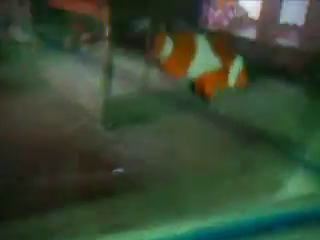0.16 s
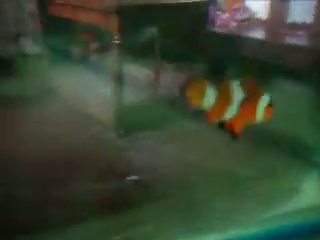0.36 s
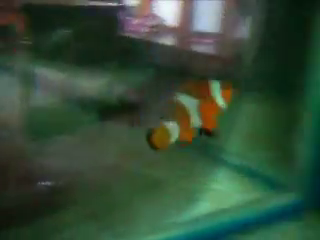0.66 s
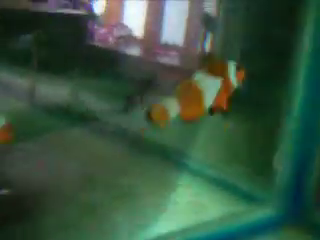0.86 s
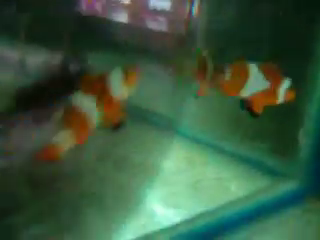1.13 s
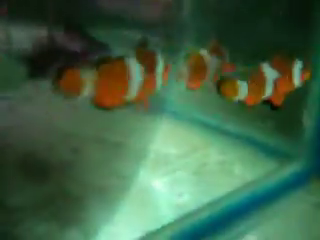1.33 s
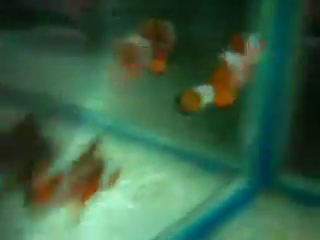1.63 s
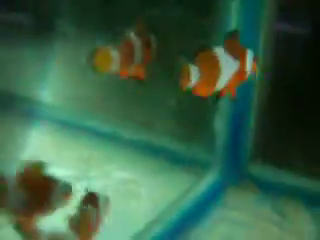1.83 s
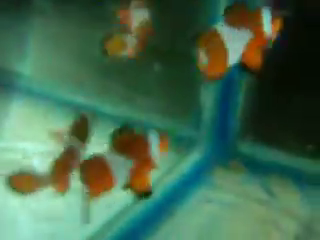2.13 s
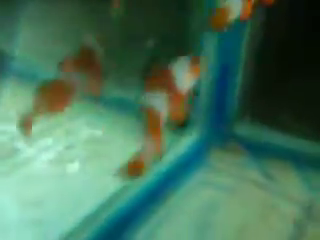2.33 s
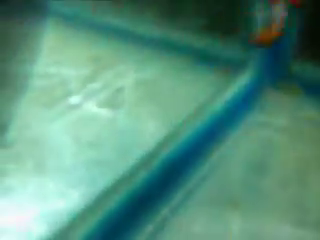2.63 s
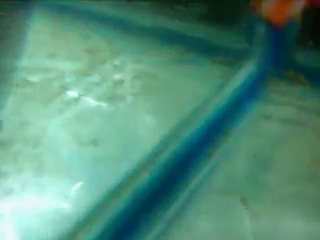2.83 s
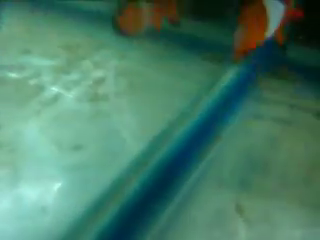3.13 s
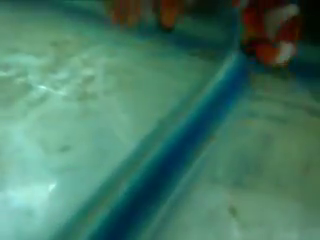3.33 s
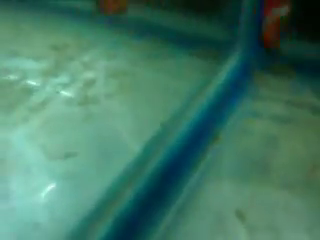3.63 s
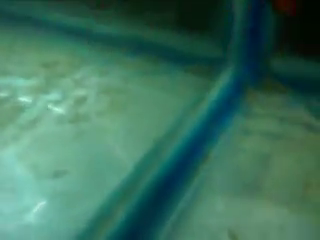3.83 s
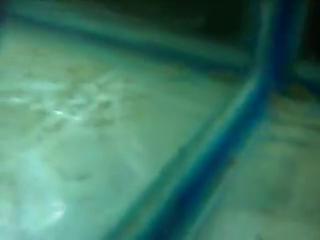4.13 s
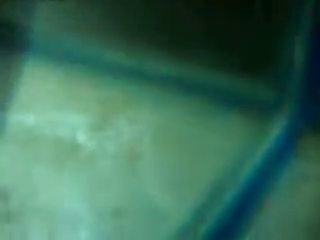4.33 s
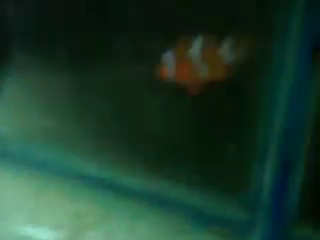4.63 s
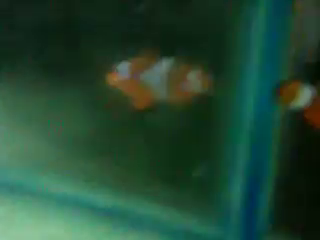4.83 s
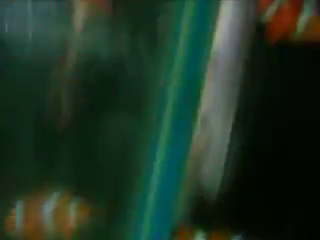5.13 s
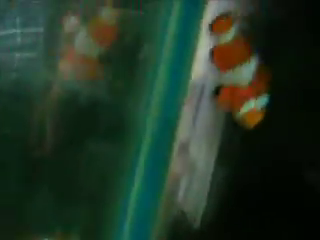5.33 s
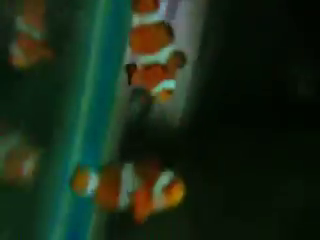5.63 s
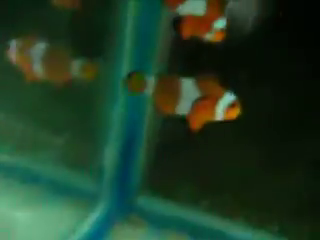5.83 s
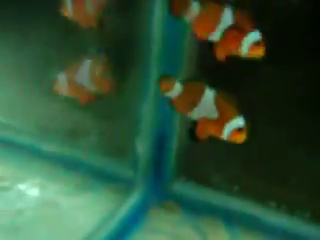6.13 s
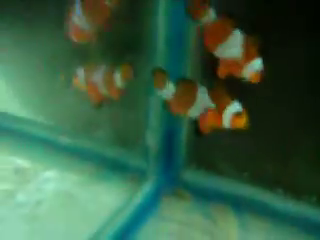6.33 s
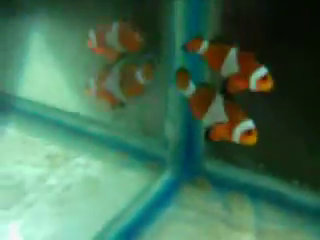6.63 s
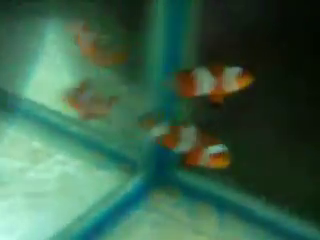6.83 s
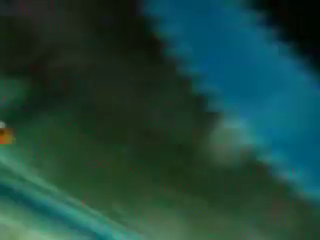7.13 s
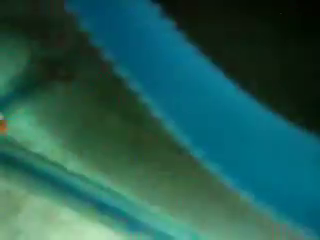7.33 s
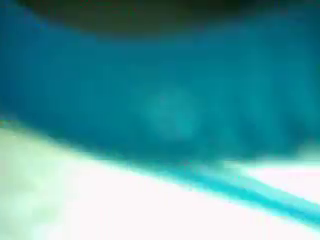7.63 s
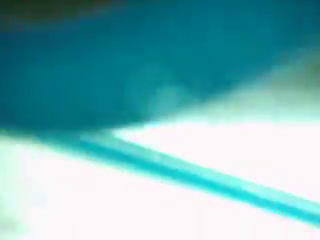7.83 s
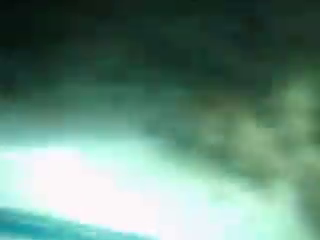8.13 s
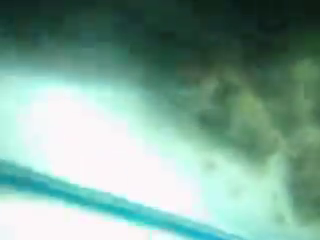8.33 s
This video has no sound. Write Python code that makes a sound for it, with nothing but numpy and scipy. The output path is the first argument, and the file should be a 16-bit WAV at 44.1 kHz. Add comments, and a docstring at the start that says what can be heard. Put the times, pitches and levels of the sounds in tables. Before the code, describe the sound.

Inside a fish tank, a low buzzing motor hum and water rumble are dotted with bubbles, ending in a burst of distorted gurgling.

```python
"""A hum and the rumble of water come first, soon with popping bubbles: a small camera in a waterproof case
is moved about inside a fish tank. The pump hum is a sum of mains harmonics that overloads the microphone,
the current is coloured noise, and bubbles are short gliding tones that set the case ringing.
At the end the case nears the surface: the water sloshes and gurgles round it and the hum fades away."""
import sys
import numpy as np
from scipy import signal
from scipy.fft import rfft, irfft, next_fast_len
from scipy.io import wavfile
from scipy.ndimage import uniform_filter1d

SR = 44100
rng = np.random.default_rng(int(sys.argv[2]) if len(sys.argv) > 2 else 0)


def inscribe(sig):
    """Save sig as 16-bit PCM at rate SR to the path in sys.argv[1].

    A 1-D sig is mono; a 2-D sig holds one channel per row.
    Samples are clipped to [-1, 1] before scaling.
    """
    pcm = np.round(np.clip(np.atleast_2d(sig).T, -1, 1) * 32767)
    wavfile.write(sys.argv[1], SR, pcm.astype(np.int16))


N = 373527


def from_db(db):
    """Decibels to gain."""
    return 10 ** (np.asarray(db) / 20)


def rms_one(x):
    """Scale to rms 1."""
    return x / np.sqrt(np.mean(x ** 2) + 1e-20)


def in_time(rows):
    """Each column of a curve table, joined by straight lines, at every sample."""
    seconds, *columns = np.transpose(rows)
    return [np.interp(np.arange(N) / SR, seconds, column) for column in columns]


def at_hz(points, hz):
    """Read a spectrum table on a log-frequency axis."""
    freqs, values = np.transpose(points)
    return np.interp(np.log(hz), np.log(freqs), values)


def drift(rate):
    """A slow random curve of spread 1, changing about rate times a second."""
    # made at one value per 40 samples, with the filter's start-up thrown away
    r = np.exp(-80 * np.pi * rate / SR)
    noise = rng.standard_normal(N // 40 + 2002)
    slow = signal.lfilter([1], [1, -2 * r, r * r], noise)[2000:]
    return np.interp(np.arange(N) / 40, np.arange(len(slow)), rms_one(slow))


def coloured_noise(spectrum):
    """Noise of rms 1 shaped by a spectrum table."""
    size = next_fast_len(N)
    hz = np.maximum(np.fft.rfftfreq(size, 1 / SR), 1)
    shaped = rfft(rng.standard_normal(size)) * from_db(at_hz(spectrum, hz))
    return rms_one(irfft(shaped, size)[:N])


def ring(clicks, hz, t60):
    """A resonance: each unit click starts a sine of height 1 that falls 60 dB in t60 seconds."""
    r, w = np.exp(-np.log(1000) / (t60 * SR)), 2 * np.pi * hz / SR
    return signal.lfilter([0, np.sin(w)], [1, -2 * r * np.cos(w), r * r], clicks + 1e-18)


def bubble(hz, t60, swell_s, glide):
    """One bubble: a sine that swells quickly, dies away and glides up by a share of its pitch."""
    t = np.arange(round(max(t60, .01) * SR)) / SR
    pitch = hz * (1 + glide * (t / t60 - .2))
    envelope = (1 - np.exp(-(t / swell_s) ** 2)) * np.exp(-np.log(1000) * t / t60)
    tone = np.sin(2 * np.pi * np.cumsum(pitch) / SR)
    return rng.choice([-1, 1]) * envelope / envelope.max() * tone


def add(out, s, sound):
    """Mix a sound in at time s."""
    start = max(round(s * SR), 0)
    out[start:start + len(sound)] += sound[:max(N - start, 0)]


# Pump hum as the case moves through the tank's standing waves. Each row: time in seconds, level of the
# twice-mains tone in dB, basic level of the case's buzz in dB, tilt of the buzz in dB per octave.
HUM_CURVE = [(0, -9.5, -23, -5.5), (.85, -13, -26.5, -5), (1.25, -20, -22.5, 3), (1.75, -4.5, -20.5, 3.5),
             (2.2, -3.5, -22.5, -3), (3.6, -1.5, -17.5, -1.5), (4.7, -1.5, -19.5, -2),
             (6.15, -4, -22.5, -2), (6.6, -6.5, -14.5, 1.5), (7.65, -7, -13, 3), (7.82, -14, -17.5, 7.5),
             (7.95, -31.5, -20, 4.5), (8.47, -37, -32.5, 14)]
# The overtones with which the case buzzes.
# Each row: multiple of the mains frequency, level in dB against the basic buzz, polarity (+1 or -1).
BUZZ_OVERTONES = [(3, -9.5, -1), (5, -6, 1), (7, -2, 1), (11, -23.5, 1), (17, -21, 1)]
MAINS_HZ, TILT_PIVOT_HZ = 59.88, 360
PULL_OFFSET_TURNS = .065  # of the mains cycle, for the magnets' pull
# the once-a-cycle shake is steady until the case rises to the surface, where it drops away
SHAKE_DB, SHAKE_LOSS_DB, RISE_FROM_S, RISE_TO_S = -14, 20.5, 6.8, 7.95


def pump(buzz_waver_db=2.5, slide_rad=0.055, overtone_db=-17.0):
    """The rotor shakes once a mains cycle and the magnets pull twice; higher orders make the case buzz."""
    pull_db, buzz_db, tilt_db = in_time(HUM_CURVE)
    shake_db, = in_time([(RISE_FROM_S, SHAKE_DB), (RISE_TO_S, SHAKE_DB - SHAKE_LOSS_DB)])
    turn = 2 * np.pi * MAINS_HZ * np.arange(N) / SR
    shake = from_db(shake_db) * np.cos(turn)

    # a strong pull is lopsided: its octave grows with the square of its strength
    pull_gain = from_db(pull_db)
    pull_turn = 2 * (turn + 2 * np.pi * PULL_OFFSET_TURNS)
    octave = from_db(overtone_db) * pull_gain ** 2 * np.cos(2 * pull_turn)
    pull = pull_gain * np.cos(pull_turn) - octave

    # the paths through the water shift, so the higher orders swell and slide against the low ones
    buzz = np.zeros(N)
    for multiple, db, polarity in BUZZ_OVERTONES:
        tilt = tilt_db * np.log2(multiple * MAINS_HZ / TILT_PIVOT_HZ)
        gain = from_db(buzz_db + db + tilt + buzz_waver_db * drift(2.7))
        buzz += np.sign(polarity) * gain * np.cos(round(multiple) * (turn + slide_rad * drift(1.0)))
    return -np.sqrt(2) * (shake + pull + buzz)


# The current at the case, strongest in the pump's stream.
# Each row: time in seconds, level of the rush in dB, level of the deep slosh in dB.
WATER_CURVE = [(0, -24.5, -23.5), (1.7, -22.5, -21.5), (2.3, -20, -25.5), (3.6, -16, -24),
               (4.9, -13, -28.5), (5.5, -17, -29.5), (6.1, -18.5, -35), (7.1, -11.5, -22.5),
               (8.0, -23.5, -42.5), (8.47, -31, -26)]
# Colour of the rush as the case passes it on. Each row: frequency in Hz, relative level in dB per Hz.
CURRENT_SPECTRUM = [(30, -10.5), (90, -5), (125, -5.5), (160, 0.5), (210, -10.5), (280, -11), (340, -7),
                    (400, -4), (520, -11), (660, -22.5), (880, -22), (1100, -14), (1400, -29.5),
                    (2000, -32), (5500, -48.5)]
# Colour of the deep slosh. Each row: frequency in Hz, relative level in dB per Hz.
SLOSH_SPECTRUM = [(12, -0.5), (30, -1.5), (70, -6), (130, -5.5), (250, -22.5), (600, -57), (2000, -90)]
CHURN_DB = -12  # extra rush of the churning water


def flow(current_db, slosh_db, lumpy_db=1.02, slosh_lumpy_db=1.0):
    """Eddies of the current buffet the case; near the surface the whole water body heaves."""
    rush_gain = from_db(current_db) + from_db(CHURN_DB) * churn()
    current = rush_gain * from_db(lumpy_db * drift(21)) * coloured_noise(CURRENT_SPECTRUM)
    slosh_gain = from_db(slosh_db) + heave()
    slosh = slosh_gain * from_db(slosh_lumpy_db * drift(2.0)) * coloured_noise(SLOSH_SPECTRUM)
    return current + slosh


# Strength of small bubbles by pitch. Each row: pitch in Hz, relative level in dB.
FIZZ_SPECTRUM = [(420, 4.5), (540, -8), (700, -12), (900, -9), (1100, -3), (1300, -22), (1650, -2.5),
                 (2100, -22), (3000, -17), (4200, -24.5)]
FIZZ_PER_S, FIZZ_CYCLES = 110, 98  # typical rate of pops; cycles each takes to fall 60 dB
FIZZ_DB, FIZZ_FOLLOWS = -8.5, 1.32  # level in a full-scale current, and dB gained per dB of current


def small_bubbles(level_db, spread_db=4.0, count=36):
    """Little bubbles pop in random clusters, each ringing at its own pitch."""
    sizes = from_db(spread_db * np.minimum(rng.exponential(1, N), 3)) * rng.choice([-1, 1], N)
    born = sizes * (rng.random(N) < FIZZ_PER_S * from_db(3 * drift(7)) / SR)
    # every bubble is dealt at random to one of the pitches
    pitches, dealt = np.geomspace(420, 4200, count), rng.integers(0, count, N)
    rings = np.zeros(N)
    for k, hz in enumerate(pitches):
        rings += from_db(at_hz(FIZZ_SPECTRUM, hz)) * ring(born * (dealt == k), hz, FIZZ_CYCLES / hz)
    return from_db(level_db) * rms_one(rings)


# Strings of bubbles, low ones gurgling and high ones warbling. Each row: start in seconds,
# end in seconds, first pitch in Hz, last pitch in Hz, typical bubble level in dB.
BUBBLE_STRINGS = [(0.049, 1.005, 746, 1000, -36), (.45, 0.902, 1494, 1570, -41),
                  (1.0, 1.695, 1080, 1080, -37.5), (2.8, 4.8, 1200, 1301, -27.5),
                  (7.25, 7.39, 520, 516, -4.5), (7.249, 7.388, 1182, 1180, -11),
                  (7.65, 7.808, 532, 520, -7), (7.851, 8.199, 444, 424, -15),
                  (7.873, 8.071, 1126, 1227, -14), (8.13, 8.229, 1225, 1250, -22.5),
                  (8.177, 8.47, 1606, 1754, -27.5)]
TRICKLE_PER_S = 68


def trickle(scatter_octaves=.11, t60=0.052, spread_db=3.0):
    """Close strings of bubbles of about one size, overlapping into a warble."""
    out = np.zeros(N)
    for start, end, first_hz, last_hz, level_db in BUBBLE_STRINGS:
        count = max(round((end - start) * TRICKLE_PER_S), 1)
        for k, (late, size, detune) in enumerate(rng.standard_normal((count, 3))):
            share = (k + .5 * late) / count  # how far along the string
            hz = (first_hz + share * (last_hz - first_hz)) * 2 ** (scatter_octaves * detune)
            gain = from_db(level_db + spread_db * min(size, 2))
            add(out, start + share * (end - start), gain * bubble(hz, t60, swell_s=0.0068, glide=0.18))
    return out


# Lesser bubbles break at random, many more and bigger in churning water.
STRAY_PER_S, CHURN_STRAY_PER_S = 5, 12  # calm rate; rate added by full churning
STRAY_DB, CHURN_STRAY_DB, STRAY_GULP_DB = -28.5, 11, -4.5  # ring; gain by churning; gulp against ring
STRAY_HZ, STRAY_GULP_HZ = 1080, 520  # middle pitches


def stray_bubbles(spread_db=5.5, scatter_octaves=.12):
    """Rows like those of the big bubbles, at random; churning raises their rate and size."""
    churned = churn()
    born = np.flatnonzero(rng.random(N) < (STRAY_PER_S + CHURN_STRAY_PER_S * churned) / SR)
    detune, ring_size, gulp_size = rng.standard_normal((len(born), 3)).T
    level_db = STRAY_DB + CHURN_STRAY_DB * churned[born]
    pitch = 2 ** (scatter_octaves * detune)
    ring_db = level_db + spread_db * ring_size
    gulp_db = level_db + STRAY_GULP_DB + spread_db * gulp_size
    return list(zip(born / SR, STRAY_HZ * pitch, ring_db, STRAY_GULP_HZ * pitch, gulp_db))


# Big bubbles breaking at the case. Each row: time in seconds, pitch of the ring in Hz,
# level of the ring in dB, pitch of the low gulp in Hz, level of the gulp in dB.
BIG_BUBBLES = [(0.064, 755, -7.5, 478, -7.5), (0.222, 866, -21, 460, -21), (0.316, 967, -22, 453, -20),
               (0.448, 1170, -16, 463, -13.5), (0.507, 790, -18, 668, -16), (0.576, 1250, -21.5, 480, -26),
               (0.614, 977, -18, 444, -24.5), (0.681, 920, -11.5, 690, -20), (0.691, 1550, -24.5, 480, -36),
               (0.74, 1014, -13.5, 765, -14), (0.818, 844, -17, 492, -23), (0.902, 1048, -20, 550, -32),
               (1.046, 1110, -10, 555, -38), (1.114, 1028, -9.5, 430, -32), (1.186, 1015, -24, 464, -19),
               (1.323, 1066, -10, 410, -8.5), (1.488, 1150, -5.5, 723, -11.5), (1.529, 1060, -16, 430, -28),
               (1.698, 977, -8.5, 724, -14), (1.739, 1070, -9, 700, -21), (1.839, 1050, -7.5, 730, -20.5),
               (2.556, 1092, -9.5, 430, -25.5), (2.668, 1074, -10, 584, -23), (5.226, 940, -17.5, 536, -13),
               (5.545, 1015, -14.5, 576, -6), (5.867, 940, -14.5, 541, -4), (6.114, 1022, -6.5, 560, -15.5),
               (6.175, 1105, -12.5, 430, -27), (6.296, 1070, -12, 582, -11.5), (6.363, 973, -9.5, 505, 7.5),
               (6.399, 788, -1.5, 512, 4.5), (6.431, 965, -3, 507, 1.5), (6.68, 1138, -8, 528, -6.5),
               (6.909, 1240, -10.5, 549, -5.5), (7.233, 1159, 0.5, 575, -3), (7.246, 1177, 0, 525, 3.5),
               (7.286, 1215, 5.5, 542, 3), (7.325, 1099, 9.5, 548, 10), (7.351, 1005, -8, 509, 8),
               (7.371, 1122, -4, 512, -11), (7.405, 1135, 3, 522, 3.5), (7.448, 1170, -6, 516, 8),
               (7.463, 1174, 2, 552, -8.5), (7.511, 1180, 3, 538, 0.5), (7.589, 1140, -6.5, 482, 0),
               (7.604, 1160, 3, 490, 7), (7.654, 1055, 1, 536.7, 1), (7.676, 1203, 4, 520, 10.5),
               (7.737, 1104, -4, 520, 3.5), (7.771, 1070, -1.5, 541, -0.5), (7.797, 825, 1, 520, 4.5),
               (7.848, 1090, 14.5, 529, 12), (7.909, 1210, -12, 541, -11), (7.926, 1218, -1, 508, -5.5),
               (7.946, 1048, -2.5, 530, -5.5), (7.984, 1130, -10, 445, -15), (8.013, 1143, -11, 519, -4.5),
               (8.03, 1184, -4, 510, -11.5), (8.055, 1128, -7, 537, -2.5), (8.108, 1158, -2, 547, -1.5),
               (8.182, 1090, -12, 435.4, -18), (8.234, 1070, -13, 580, -19), (8.306, 1570, -10, 465, -31),
               (8.341, 1095, -1.5, 599, -9), (8.385, 1117, -14, 624, -22), (8.408, 1676, -15, 464, -20),
               (8.43, 1084, -7, 635, -14)]
# What the camera case rings with.
# Each row: pitch in Hz, level in dB, time to fall 60 dB in seconds.
CASE_RINGS = [(421, -10.5, 0.14), (820, -8, 0.026), (1070, -7, 0.044), (1564, -18, 0.021),
              (1900, -26.5, 0.048), (2940, -29.5, 0.027)]
RING_T60_S = 0.06  # when ring and gulp are equally strong
CLEAN_DB_PER_DOUBLING = 46.5  # the ring lasts twice as long for this much more ring than gulp


def big_bubbles(gulp_t60=0.073, jolt_db=5.5, jolt_s=0.0036, jolt_swell_s=0.0014,
                jolt_from_gulp=0.31, snap_db=-14):
    """Each bubble breaks with a ring and a lower gulp; its ragged jolt sets the case ringing."""
    out, jolts = np.zeros(N), np.zeros(N)
    t = np.arange(SR // 10) / SR
    jolt_shape = (1 - np.exp(-t / jolt_swell_s)) * np.exp(-t / jolt_s)
    for s, hz, ring_db, low_hz, gulp_db in list(BIG_BUBBLES) + stray_bubbles():
        ring_t60 = RING_T60_S * 2 ** ((ring_db - gulp_db) / CLEAN_DB_PER_DOUBLING)
        add(out, s, from_db(ring_db) * bubble(hz, ring_t60, swell_s=0.0015, glide=0.086))
        add(out, s, from_db(gulp_db) * bubble(low_hz, gulp_t60, swell_s=0.0024, glide=0.096))
        # a bubble without much of a gulp rings cleanly and hardly jolts the case
        force = from_db(ring_db + jolt_from_gulp * (gulp_db - ring_db))
        add(jolts, s, force * jolt_shape * rng.standard_normal(len(t)))
    push = from_db(jolt_db) * jolts / np.sqrt(jolt_s * SR / 2)  # evens out the jolt's length
    case = sum(from_db(db) * ring(push, hz, t60) for hz, db, t60 in CASE_RINGS)
    snap_band = signal.butter(1, [600, 3000], "band", fs=SR, output="sos")
    return out + case + from_db(snap_db) * signal.sosfilt(snap_band, jolts)


def tank(x, wet_db=-11, t60=.09):
    """Dense, quickly dying echoes between the glass walls."""
    t = np.arange(SR // 5) / SR
    echoes = rng.standard_normal(len(t)) * np.exp(-np.log(1000) * t / t60) * (t > .003)
    return x + from_db(wet_db) * signal.fftconvolve(x, echoes / np.linalg.norm(echoes))[:N]


# Tiny bubbles bursting on the case with a dry tick.
# Each row: time in seconds, level in dB before the treble is picked out.
TICK_TIMES = [(0.438, -17), (0.605, -26), (0.728, -17), (1.491, -21), (2.668, -19), (4.729, -11),
              (4.92, -12.5), (6.403, 7)]
TICK_DECAY_S, TICK_LOW_HZ, TICK_HIGH_HZ = 0.0015, 1900, 4500


def ticks():
    """Each tiny burst is a very short puff of treble noise."""
    out, t = np.zeros(N), np.arange(SR // 50) / SR
    for s, level_db in TICK_TIMES:
        puff = np.exp(-t / TICK_DECAY_S) * rms_one(rng.standard_normal(len(t)))
        add(out, s, from_db(level_db) * puff)
    band = signal.butter(2, [TICK_LOW_HZ, TICK_HIGH_HZ], "band", fs=SR, output="sos")
    return signal.sosfilt(band, out)


# the swing towards the surface churns the water
CHURN_START_S, CHURN_ATTACK_S, CHURN_HOLD_S, CHURN_RELEASE_S = 7.16, 0.045, 0.527, 0.14


def churn():
    """How hard the water is churned, 0 to 1: attack, hold, release."""
    t = np.arange(N) / SR - CHURN_START_S
    rise = t / CHURN_ATTACK_S
    fall = 1 - (t - CHURN_ATTACK_S - CHURN_HOLD_S) / CHURN_RELEASE_S
    return np.clip(np.minimum(rise, fall), 0, 1)


# the swing also heaves the whole water body, which then settles
SWING_S, HEAVE_DB, HEAVE_RISE_DB_PER_S, HEAVE_FALL_DB_PER_S = 7.179, 1.5, 82, 31.5


def heave():
    """Gain of the deep wave that builds up to the swing and dies away after it."""
    t = np.arange(N) / SR - SWING_S
    return from_db(HEAVE_DB + np.minimum(HEAVE_RISE_DB_PER_S * t, -HEAVE_FALL_DB_PER_S * t))


def surge(half_width_s=0.011, level_db=10):
    """The case is swung round: one push of water pressure, strong enough to pin the input for a moment."""
    offset = np.clip((np.arange(N) / SR - SWING_S) / half_width_s, -1, 1)
    return from_db(level_db) * np.cos(np.pi / 2 * offset) ** 2


HISS_DB = -42.5  # the microphone's own hiss


def scene():
    """Hum, flow and bubbles over the microphone's own hiss; only the bigger bubbles and strings echo."""
    current_db, slosh_db = in_time(WATER_CURVE)
    hiss = from_db(HISS_DB) * rng.standard_normal(N)
    fizz = small_bubbles(FIZZ_DB + FIZZ_FOLLOWS * current_db)
    steady = pump() + flow(current_db, slosh_db) + fizz + hiss
    bubbles = tank(big_bubbles() + trickle())
    return (steady + surge() + ticks() + bubbles)[None]


CLIP_TOP, CLIP_BOTTOM, OVERSHOOT_LIMIT = .606, .668, 0.698  # of full scale
CUTOFF_HZ, TOP_HZ, PREAMP_HISS_DB = 5580, 16000, -59.5


def record(dry):
    """The input clips hard, sooner on top, and loses its upper treble; overshoots clip again and tick."""
    # the coupling capacitor shifts the bias until the clipped wave has almost no mean
    bias = 0
    for _ in range(5):
        bias = bias - uniform_filter1d(np.clip(dry + bias, -CLIP_BOTTOM, CLIP_TOP), SR // 5)
    preamp_hiss = from_db(PREAMP_HISS_DB) * rng.standard_normal(N)
    clipped = np.clip(dry + bias, -CLIP_BOTTOM, CLIP_TOP) + preamp_hiss
    fade_in = np.minimum(np.arange(N) / (.004 * SR), 1) ** 2
    low_pass = signal.firwin(161, CUTOFF_HZ, window=("kaiser", 8), fs=SR)[None]
    narrow = signal.fftconvolve(fade_in * clipped, low_pass, "same")
    ticking = np.clip(narrow, -OVERSHOOT_LIMIT, OVERSHOOT_LIMIT)
    return signal.sosfilt(signal.butter(12, TOP_HZ, fs=SR, output="sos"), ticking)


dry = scene()
out = record(dry)
inscribe(out)
```